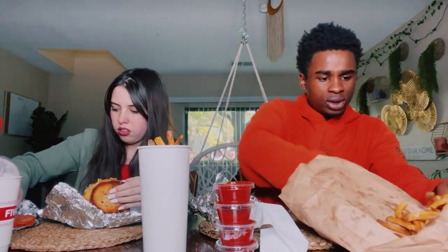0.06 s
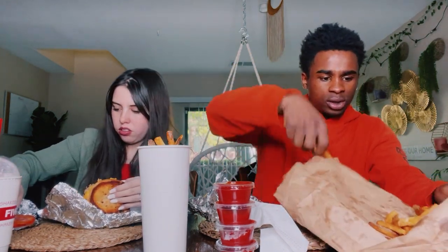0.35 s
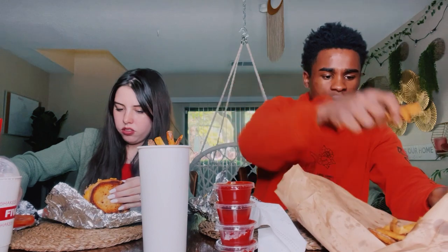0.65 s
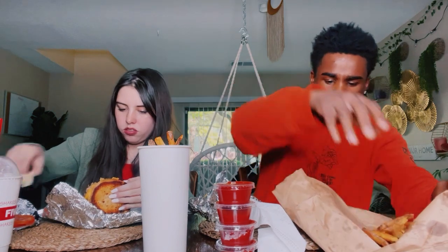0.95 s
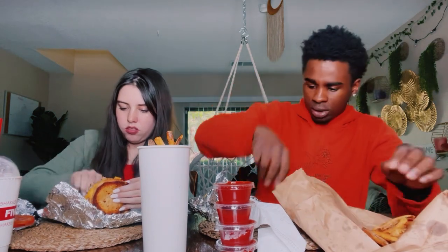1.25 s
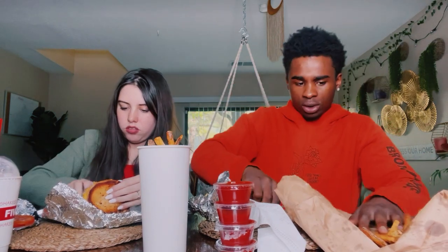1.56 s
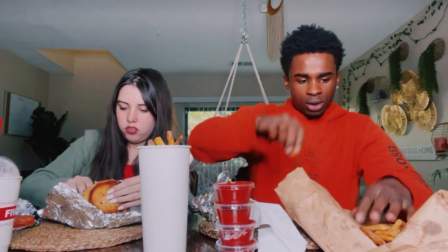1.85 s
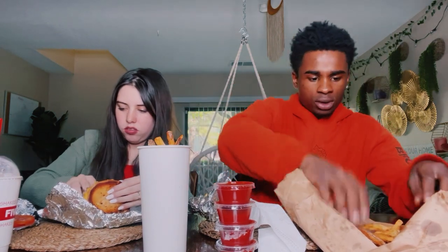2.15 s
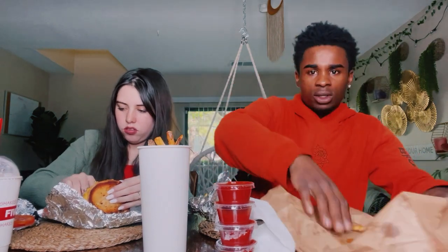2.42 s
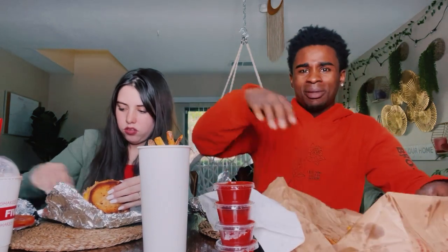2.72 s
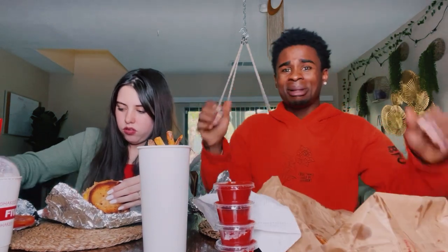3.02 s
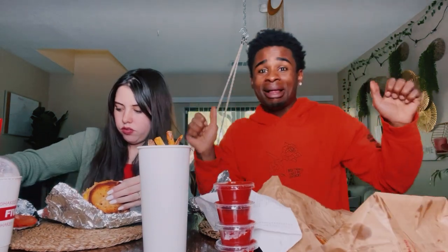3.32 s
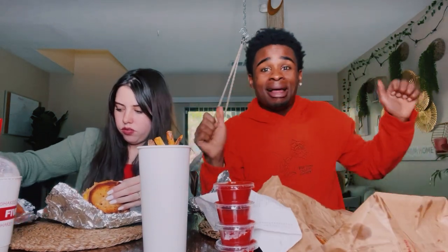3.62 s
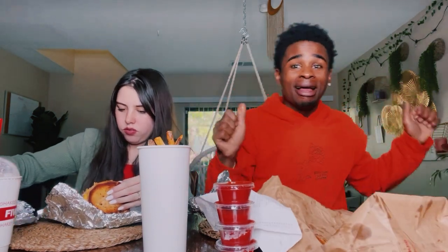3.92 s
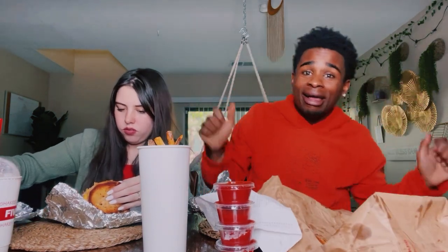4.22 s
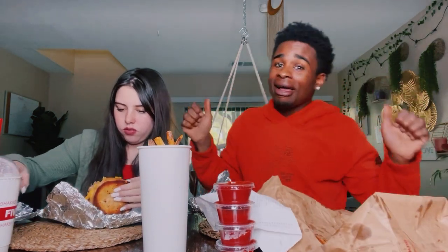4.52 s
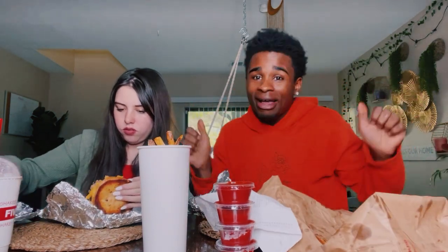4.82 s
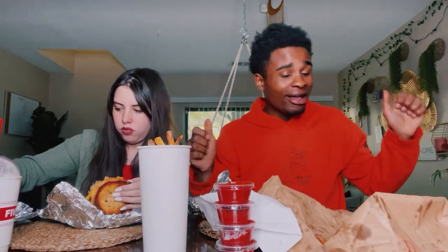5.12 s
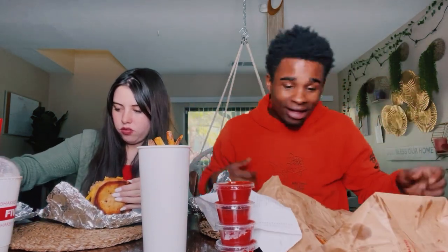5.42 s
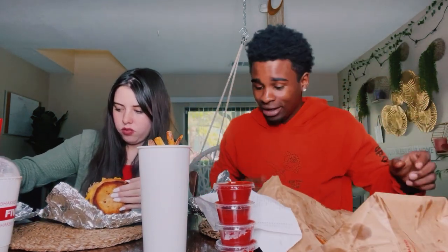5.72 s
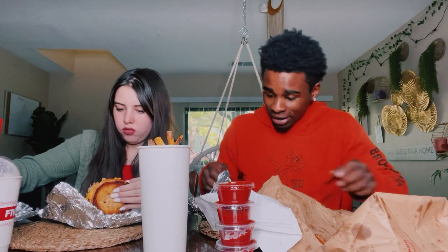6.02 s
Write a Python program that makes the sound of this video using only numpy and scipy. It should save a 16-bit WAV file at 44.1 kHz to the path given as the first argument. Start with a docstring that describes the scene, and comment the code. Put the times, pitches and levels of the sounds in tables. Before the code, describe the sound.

A paper takeout bag is handled on a dining table, close to the microphone and to the right, in a slightly echoing room with faint background hiss. From the start it crackles densely, with single sharp crease snaps and hollow pops, peaking at about 0.8 seconds while the table booms softly. After a short lull, another burst comes at 1.5 seconds. The longest loud crumpling runs from about 2.1 to 2.6 seconds as the bag is pressed flat, with two more sharp snaps just before 3 seconds. Then it is much quieter: light touches on paper, small clicks and low bumps as someone shifts in a seat. Clicks fall around 4.1 and 5.2 seconds, now more to the left. A few very faint, brief squeaks come between 4.6 and 5.7 seconds, and a light rustle with small clicks ends it around 6 seconds.

```python
"""A paper takeout bag is pushed, rummaged in and pressed flat on a dining table in a live room.
From the start, over faint room tone, its creases buckle in dense crackles and the table booms softly;
large creases snap singly and flat panels flip with hollow pops. After three seconds come only light
touches, small clicks and low bumps as someone shifts in a seat, and near the end a few faint
stick-slip squeaks. Two close microphone ports receive the direct sound and the room's echoes."""
import sys
import numpy as np
from scipy import signal
from scipy.fft import rfft, irfft, next_fast_len
from scipy.io import wavfile
from scipy.ndimage import uniform_filter1d

SR = 44100
rng = np.random.default_rng(int(sys.argv[2]) if len(sys.argv) > 2 else 0)


def wrap_up_sound(samples):
    """Save the sound to the file named by the first command line argument, as 16-bit audio."""
    columns = np.atleast_2d(samples).T
    # keep every value between -1 and 1, then stretch to whole-number steps
    tamed = np.clip(columns, -1, 1)
    steps = np.round(tamed * 32767).astype(np.int16)
    wavfile.write(sys.argv[1], SR, steps)


N = 267687
TIME = np.arange(N) / SR
BODY_HZ, RASP_HZ, CRISP_HZ = 600, 2300, 5500  # edges between the four registers

# Levels in the tables are relative.
# room air and microphone hiss: frequency_hz, density_db
AIR_SPECTRUM = [(20, -11.5), (130, 2), (290, -4), (470, -8.5), (680, -21.5), (1200, -22.5), (3600, -32),
                (5200, -32.5), (7000, -38), (10500, -32), (13200, -35), (14500, -48.5)]
# the background, a little lower while the paper is loud: time_s, gain_db
BACKGROUND_GAIN = [(0.0, -4), (1.3, -5.5), (3.2, -0.5)]
# strokes of a hand on paper: start_s, length_s, attack_s, level_db, easing_db, body_db, rasp_db, crisp_db
HAND_STROKES = [(0.0, 0.17, 0.00041, -41.5, 11.5, 0.5, -0.5, 0.5),
                (0.176, 0.14, 0.0048, -42, 7.5, 0.5, -1, 0), (0.335, 0.21, 0.03, -43.5, 4, 2, -0.5, -1),
                (0.554, 0.25, 0.011, -48.5, 0.5, 0.5, -4.5, -7),
                (0.763, 0.04, 0.0073, -29, 6.5, -2, 0.5, -1.5), (0.811, 0.21, .01, -46, 28, -0.5, 0, -15),
                (1.343, 0.26, 0.012, -52.5, -10, -4, -15.5, -4),
                (1.468, 0.066, 0.048, -31.5, 1.5, -2, -2, -2.5), (1.563, 0.25, 0.022, -51, 1.5, -1, 0, -3),
                (1.778, 0.041, 0.02, -44, -2.5, -5.5, 2, 0), (2.133, 0.098, 0.032, -31, 0, -4, -3, -1.5),
                (2.253, 0.17, 0.011, -35, 8, 1.5, 2.5, 1), (2.415, 0.2, 0.0073, -43, 14.5, -0.5, -3, 3),
                (2.721, 0.14, 0.018, -50, 7, 3.5, 8, 8.5), (3.343, 0.08, 0.027, -74, 1, -13.5, 7, -1),
                (3.48, 0.057, 0.037, -70.5, 1.5, 0, -1.5, 2.5), (3.673, 0.047, 0.022, -74, 2, -8, 5, -21),
                (3.799, 0.17, 0.079, -67, 0.5, 6, -3, -7.5),
                (4.039, 0.058, 0.045, -55.5, -5, -2, -25, -4.5),
                (4.456, 0.067, 0.037, -75, 0.5, -1.5, -4, 4.5),
                (5.248, 0.052, .004, -62.5, 4.5, 4.5, -3.5, 3.5),
                (5.641, 0.13, 0.066, -68.5, 2, 2, -3.5, 7.5), (5.88, 0.17, 0.025, -63, -3, 6.5, 3.5, 7)]
# radiation of a buckling crease: frequency_hz, density_db
PAPER_SPECTRUM = [(40, -27.5), (100, -4.5), (200, 0.5), (350, 0), (700, -3), (1250, -0.9), (2400, -3.5),
                  (4200, -10.5), (5700, -11.5), (7200, -17.5), (10000, -15.5), (13000, -20.5),
                  (15000, -34.5), (16500, -43)]
# boom of the furniture: frequency_hz, density_db
BOOM_SPECTRUM = [(20, -9.5), (40, -8.5), (56, 3.5), (70, 8), (88, -7), (135, -4), (190, -26.5), (400, -72)]
# low bumps of table and seat: start_s, level_db
FURNITURE_BUMPS = [(0.39, -55), (0.8, -50), (1.5, -56), (2.169, -44.5), (2.35, -54), (2.779, -59.5),
                   (3.036, -49.5), (3.479, -59), (3.899, -59.5), (4.16, -55.5), (4.28, -59), (5.725, -58.5),
                   (5.93, -58)]
# single crease snaps and light clicks: start_s, energy_db, body_db, crisp_db, ring_hz, flutter_decay_s
CREASE_SNAPS = [(0.0189, -18, -16, 6.5, 4200, 0.00063), (0.064, -16.5, -2.5, -14, 1470, 0.0044),
                (0.1156, -22, -5, -4.5, 1300, 0.0009), (0.1284, -11, 0.5, -0.5, 2500, .0012),
                (0.1744, -25.5, -1.5, 16.5, 4440, 0.00071), (0.198, -11.5, 5.5, -13.5, 1250, .0036),
                (0.378, -19, 0.5, -7.5, 925, 0.0031), (0.404, -19.5, -4.5, 2, 5120, 0.0013),
                (0.416, -12, -1, -7.5, 850, 0.0015), (0.442, -13, 0.5, -8.5, 790, 0.001),
                (0.5045, -15, -2, 0.5, 2300, 0.0035), (0.513, -15.5, -9, -7.5, 3000, 0.001),
                (0.529, -24, -4, 17.5, 5080, 0.00083), (0.5843, -9, -1.5, -1.5, 578, .0046),
                (0.594, -24.5, 0, -4, 1650, 0.0017), (0.6239, -11.5, -7.5, 2.5, 1907, 0.002),
                (0.658, -13, -4, 8.5, 705, 0.0013), (0.6759, -15, -1, 4, 1184, 0.0038),
                (0.731, -14, -1, 1.5, 445, .0012), (0.773, -14, -5, 7, 1274, 0.0018),
                (0.7913, -7, -3.5, 9.5, 1296, 0.0019), (1.2046, -35.5, 9.5, -30, 930, 0.0023),
                (1.3633, -28.5, -6.5, 1, 2200, .003), (1.4871, -11, -1.5, -1, 1300, 0.00055),
                (1.4995, -6, -1.5, -3, 1347, 0.0024), (1.521, -9, 0, -4, 1912, .005),
                (1.6061, -13, -9, 3.5, 3280, 0.00034), (1.648, -17, 6, 4, 721, 0.00071),
                (1.7871, -11, -11, 3.5, 2956, 0.0011), (1.808, -19.5, -4.5, -2.5, 2040, 0.0015),
                (1.9784, -17, -4, -1.5, 2883, 0.0037), (2.076, -35, 6, 6, 10500, 0.0053),
                (2.149, -11, 1, 6.5, 1220, 0.0045), (2.162, -7.5, -1.5, -4, 1050, 0.012),
                (2.2012, -11, -3.5, 8.5, 1500, .0008), (2.2118, -10, -6.5, 10.5, 3645, 0.0011),
                (2.232, -7.5, -5, 0, 2007, 0.0023), (2.2815, -7, -3, -7.5, 1100, 0.00099),
                (2.3061, -4.5, -8.5, -2, 2088, 0.00045), (2.3577, -7, 1.5, 3.5, 4000, 0.00041),
                (2.4198, -10, -1, -0.5, 450, 0.0014), (2.7418, -3.5, -3.5, 3.5, 2360, 0.0011),
                (2.8864, -7.5, -8, -2, 2330, 0.0012), (3.114, -20, 5, -17, 1650, 0.0056),
                (3.642, -36.5, 7.5, 4.5, 1040, 0.0089), (3.964, -39.5, 0.5, 9, 1506, 0.0054),
                (4.0362, -32, 0, -18, 1880, 0.0021), (4.102, -22.5, 4, -30, 1390, 0.017),
                (4.6574, -46, 1.5, 17.5, 3030, .007), (4.91, -46.5, -1.5, 0.5, 11000, .002),
                (5.151, -34.5, 7.5, -24.5, 820, 0.013), (5.256, -24.5, 3.5, 9.5, 1600, 0.0041),
                (5.3187, -33, 5, -16, 920, .0011), (5.896, -25, 3.5, 2, 920, 0.002),
                (5.928, -31, -3, -9, 1090, .0014), (6.009, -26.5, -12, 1, 1580, 0.0032)]
# flat panels flipping over or being knocked: start_s, pitch_hz, level_db
PANEL_POPS = [(0.128, 570, -38), (0.416, 485, -36.5), (0.442, 803, -30.5), (0.513, 566, -34.5),
              (0.527, 400, -41), (0.658, 710, -40.5), (0.774, 1243, -29.5), (0.79, 204, -32.5),
              (0.792, 1126, -32), (1.5, 820, -35), (1.527, 1020, -33), (1.526, 343, -40), (2.152, 950, -35),
              (2.158, 279, -33), (2.222, 1170, -30), (2.225, 520, -34), (2.28, 367, -28.5),
              (2.42, 359, -37), (2.419, 540, -32), (2.886, 662, -38.5), (5.151, 795, -59),
              (5.256, 445, -43.5), (5.9, 1640, -50), (5.929, 378, -48.5), (6.006, 1524, -40)]
# faint squeaks: start_s, length_s, start_hz, end_hz, level_db
SQUEAK_GLIDES = [(4.577, 0.055, 1328, 1340, -69.5), (4.927, 0.033, 2184, 2590, -68.5),
                 (4.928, 0.03, 2850, 3130, -76.5), (4.933, 0.038, 3700, 3820, -81),
                 (5.372, 0.045, 1365, 1558, -67), (5.375, 0.022, 2820, 2640, -74),
                 (5.386, 0.07, 2210, 1965, -68.5), (5.511, 0.027, 3680, 3740, -82.5),
                 (5.645, 0.025, 3630, 3770, -84)]
# where the sound is made: time_s, right_share (0 left, 1 right)
SOURCE_PLACE = [(3.2, 0.94), (3.6, 0.94), (4.1, 0.43), (4.6, 0.15), (5.2, 0.12), (5.9, 0.16), (6.02, 0.64)]
# lag of direct sound at the farther port: frequency_hz, phase_rad
FAR_PORT_LAG = [(0, 0), (200, .5), (650, 1.9), (1200, 1.9), (2500, 3.2), (4000, 6.3)]
# reverberation time of the room: frequency_hz, t60_s
ROOM_DECAY = [(100, 0.63), (400, 0.61), (1200, 0.43), (3000, 0.44), (7000, 0.33), (14000, 0.41)]
# drive to the room, weaker for touches nearer the microphone: time_s, gain_db
ROOM_DRIVE = [(2.6, 3), (5.0, 1), (5.9, 3.5)]
# surviving part of the difference between the ports: frequency_hz, gain_db
PORT_WIDTH = [(60, -8), (140, -9), (280, -4), (500, 1.5), (2500, 2), (7000, -1), (9500, -1), (11500, -6),
              (14000, -6)]
# treble phase between the ports: frequency_hz, phase_rad
PORT_PHASE_SHIFT = [(4000, 0), (5300, -2.8), (7200, -3), (9200, -1.5), (11300, -.1)]


def amp(db):
    """Converts decibels to an amplitude ratio."""
    return 10 ** (np.asarray(db) / 20)


def unit_rms(x):
    """Normalises a signal to unit mean power."""
    return x / np.sqrt(np.mean(x ** 2) + 1e-20)


def curve(points, hz):
    """Interpolates a table on a logarithmic frequency axis."""
    table_hz, value = np.transpose(points)
    return np.interp(np.log(hz + 1), np.log(table_hz + 1), value)


def add(mix, start_s, sound):
    """Superposition: a sound sums into the mix from start_s on."""
    part = mix[max(round(start_s * SR), 0):][:len(sound)]
    part += sound[:len(part)]


def filtered(x, response):
    """Linear filtering: the spectrum is multiplied by a frequency response."""
    size = next_fast_len(x.shape[-1] + 4096)
    return irfft(rfft(x, size) * response(np.fft.rfftfreq(size, 1 / SR)), size)[..., :x.shape[-1]]


def noise(spectrum, shape):
    """Spectral shaping: white noise takes on a tabulated spectrum."""
    return filtered(rng.standard_normal(shape), lambda hz: amp(curve(spectrum, hz)))


def steadied(x, span_s):
    """Division by the running rms flattens the envelope and keeps the fine structure."""
    size = max(int(span_s * SR), 2)
    power = uniform_filter1d(uniform_filter1d(x ** 2, size), size)
    return x / np.sqrt(abs(power) + 1e-4 * np.mean(x ** 2))


def registers(hz):
    """Complementary bands: the shares of body, middle, rasp and crisp treble sum to 1."""
    below = [1 / (1 + (hz / edge) ** order) for edge, order in ((BODY_HZ, 4), (RASP_HZ, 4), (CRISP_HZ, 5))]
    return np.diff(below, axis=0, prepend=0, append=1)


def room_tone(level_db=-69):
    """Stationary noise of air and microphone, uncorrelated between the ports."""
    return amp(level_db) * unit_rms(noise(AIR_SPECTRUM, (2, N)))


def hand_effort(release_s=0.013):
    """Incoherent strokes add in power; each rises, drifts and lets go. Gives one gain per register."""
    power = np.zeros((4, N))
    for start_s, length_s, attack_s, db, easing_db, body_db, rasp_db, crisp_db in HAND_STROKES:
        age = TIME - start_s
        attack = np.clip(age / attack_s, 0, 1)
        hold = amp(db - easing_db * np.clip(age / length_s, 0, 1))
        release = np.exp(-np.maximum(age - length_s, 0) / release_s)
        power += (amp([[body_db], [0], [rasp_db], [crisp_db]]) * attack * hold * release) ** 2
    return np.sqrt(power + 1e-14)


def crease(ring_hz, ring_db, flutter_s, flutter, body_db, crisp_db,
           spread_s=0.001786, ring_octaves=0.33, dulling=.25, size=2048):
    """Buckling: an impulse and a brief flutter excite a panel resonance, one row per row of ring_db."""
    t, hz = np.arange(size) / SR, np.fft.rfftfreq(size, 1 / SR)
    shake = rng.standard_normal(size) * np.exp(-t / flutter_s)
    shake *= flutter / np.linalg.norm(shake)
    shake[0] += rng.choice([-1, 1])
    force = rfft(shake)
    force /= np.sqrt(uniform_filter1d(abs(force) ** 2, size=15))  # broadband: the panel gives the colour
    resonance_db = ring_db * np.exp(-(np.log2((hz + 1) / ring_hz) / ring_octaves) ** 2)
    panel = amp(curve(PAPER_SPECTRUM, hz) + resonance_db)
    panel /= np.sqrt(np.mean(panel ** 2, axis=-1, keepdims=True))
    rasp_db = dulling * min(crisp_db, 0)  # a muffled crease loses some rasp too
    colour = panel * (amp([body_db, 0, rasp_db, crisp_db]) @ registers(hz))
    log_gain = np.log(np.concatenate([colour, colour[..., -2:0:-1]], axis=-1))
    minimum_phase = np.exp(np.conj(signal.hilbert(log_gain)))[..., :len(hz)]
    delay_s = spread_s * np.sqrt(BODY_HZ / (hz + BODY_HZ / 2))  # bending waves arrive treble first
    return irfft(force * minimum_phase * np.exp(-2j * np.pi * np.cumsum(delay_s) * hz[1]))


def rustle(gains, per_s=280, crowding=.7, size_db=6.0, rub=0.11, light_db=13,
           ring_db=9.5, level_db=-1.85, jerk_db=0.5, panels=56):
    """Small creases buckle as a Poisson process whose rate grows with effort, over sliding friction."""
    work_db = 20 * np.log10(gains[1])
    rate = per_s * amp(crowding * np.maximum(work_db + 41.5, -5))
    sizes = amp(size_db * np.minimum(rng.exponential(1, N), 2.9))
    kicks = sizes * (rng.random(N) < rate / SR)
    panel = rng.integers(0, panels, N)  # each crease rings a panel of its own size
    crackle = np.zeros(N)
    for k, ring_hz in enumerate(np.geomspace(330, 11000, panels)):
        body_db, crisp_db = rng.normal(0, 4.4, 2)
        grain = crease(ring_hz, ring_db, flutter_s=0.001, flutter=1.5, body_db=body_db, crisp_db=crisp_db)
        crackle += signal.oaconvolve(kicks * (panel == k), grain[:1024])[:N]
    sliding = unit_rms(noise(PAPER_SPECTRUM, N))
    brushing = amp(light_db * np.clip(-(work_db + 43.5) / 20, 0, 1))  # a lighter touch slides more
    paper = unit_rms(unit_rms(crackle) + rub * brushing * sliding)
    bands = np.array([band.std() * steadied(band, span_s=0.046) for band in filtered(paper, registers)])
    knots = N // 700  # paper catches and lets go in jerks of about 16 ms
    jerks = np.interp(TIME, np.linspace(0, TIME[-1], knots), rng.standard_normal(knots))
    return amp(level_db + jerk_db * jerks) * (gains * bands).sum(0)


def furniture_boom(work, background_db, push_db=-28, fidget_db=-67.5, swing_db=4, fidgets_per_s=4.9,
                   rise_s=0.051, decay_s=0.042, side_db=-6):
    """Forced vibration: strokes on the bag, shifts of weight and single bumps drive table and seat."""
    swing = np.interp(TIME * fidgets_per_s, np.arange(N), rng.standard_normal(N))
    power = amp(fidget_db + swing_db * swing + background_db) ** 2 + (amp(push_db) * work) ** 2
    for start_s, db in FURNITURE_BUMPS:
        age = np.maximum(TIME - start_s, 0)
        power += (amp(db) * np.minimum(age / rise_s, np.exp((rise_s - age) / decay_s))) ** 2
    mid, side = noise(BOOM_SPECTRUM, (2, N))
    antiphase = amp(side_db) * unit_rms(side) * np.array([[1], [-1]])
    return np.sqrt(power) * (steadied(mid, span_s=0.031) + antiphase)


def snaps(level_db=-3.5, facing_ring_db=9.0, around_ring_db=3.0, flutter=2.0):
    """Directivity: a large crease gives way and its panel beams the ring forward. Gives (facing, around)."""
    facing, around = np.zeros((2, N))
    ring_db = np.array([[facing_ring_db], [around_ring_db]])
    for start_s, db, body_db, crisp_db, ring_hz, flutter_s in CREASE_SNAPS:
        ahead, aside = amp(db + level_db) * crease(ring_hz, ring_db, flutter_s, flutter, body_db, crisp_db)
        add(facing, start_s, ahead)
        add(around, start_s, aside)
    return facing, around


def pops(rise_s=0.00071, body_decay_s=0.0057, stretch=0.068, roughness=0.54, size=4096):
    """Snap-through: a panel flips and rings as a damped oscillator, roughened by its creases."""
    out, t = np.zeros(N), np.arange(size) / SR
    for start_s, pitch_hz, db in PANEL_POPS:
        decay_s = body_decay_s * (BODY_HZ / pitch_hz) ** .25  # smaller, higher panels die sooner
        hz = pitch_hz * (1 + stretch * np.exp(-2 * t / decay_s))  # starts taut and sharp, then relaxes
        grit = unit_rms(uniform_filter1d(rng.standard_normal(size), size=30))
        ring = np.sin(2 * np.pi * np.cumsum(hz) / SR) * (1 + roughness * grit)
        envelope = (1 - np.exp(-t / rise_s)) * np.exp(-t / decay_s)
        add(out, start_s, amp(db) * ring * envelope)
    return out


def squeaks(level_db=-3.0, waver=0.055):
    """Stick-slip friction: short gliding whistles, irregular in pitch and amplitude."""
    out = np.zeros(N)
    for start_s, length_s, start_hz, end_hz, db in SQUEAK_GLIDES:
        n = int(length_s * SR)
        slip, grip = unit_rms(uniform_filter1d(rng.standard_normal((2, n)), size=70))
        hz = np.linspace(start_hz, end_hz, n) * (1 + waver * slip)
        whistle = np.sin(2 * np.pi * np.cumsum(hz) / SR) * (1 + .5 * grip)
        add(out, start_s, amp(db + level_db) * unit_rms(whistle * signal.windows.tukey(n, .5)))
    return out


def direct_sound(x, level_db=-6.5, treble_db=2.5, shade_db=7.0):
    """Path difference and shading: the nearer port hears sooner and louder. Gives (far, near)."""
    def port(hz, side):
        shade = shade_db * curve([(100, 0.41), (500, 0.7), (4000, 0.69), (9000, 0.98)], hz)
        gain = amp(level_db + treble_db * registers(hz)[-1] + side * shade)
        return gain * np.exp(1j * min(side, 0) * curve(FAR_PORT_LAG, hz))
    return np.array([filtered(x, lambda hz: port(hz, side)) for side in (-1, 1)])


def room_response(early_s=0.01, early_db=4, late_s=.035):
    """Impulse response at each port: early reflections from table and walls, then an exponential tail."""
    def level(spectrum, bins):
        return np.sqrt(abs(uniform_filter1d(abs(spectrum) ** 2, size=bins)))
    t = np.arange(SR) / SR
    taps = rng.standard_normal((2, SR)) * (t > .002) * (1 + amp(early_db) * np.exp(-t / early_s))
    hz, age, frames = signal.stft(taps, SR, nperseg=256)
    decay = 1e-3 ** (age / curve(ROOM_DECAY, hz)[:, None])
    tail = signal.istft(frames * decay, SR, nperseg=256)[1][:, :SR]
    # a diffuse field favours no pitch, so the early and late spectra are both evened out
    late = np.clip(t / late_s, 0, 1) ** 2
    parts = rfft(np.array([tail * (1 - late), tail * late]), 2 * SR)
    response = (parts * level(parts, bins=4000) / level(parts, bins=200)).sum(0)
    return irfft(response / level(response, bins=4000))[:, :SR]


def reverberation(x, wet_db=-0.66, treble_db=-3.0, patterns=6, patterns_per_s=17):
    """Room reverberation: echo patterns crossfade at a steady rate, keeping the tail smooth and diffuse."""
    cycle = patterns_per_s * TIME
    wet = 0
    for k in range(patterns):
        offset = abs((cycle - k + patterns / 2) % patterns - patterns / 2)
        share = np.cos(np.pi / 2 * np.minimum(offset, 1))
        wet = wet + signal.fftconvolve((x * share)[None], room_response(), axes=1)[:, :N]
    return filtered(wet, lambda hz: amp(wet_db + treble_db * registers(hz)[-1]))


def scene():
    """Direct and diffuse fields sum: the bag lies to the right, the late clicks more to the left."""
    background_db = np.interp(TIME, *np.transpose(BACKGROUND_GAIN))
    air = amp(background_db) * room_tone()
    gains = hand_effort()
    paper = rustle(gains)
    boom = furniture_boom(gains[1], background_db)
    snaps_facing, snaps_around = snaps()
    hollow, whistles = pops(), squeaks()
    # snaps, pops and squeaks come from spots that face the microphone, so they sound drier
    near = paper + amp(4) * snaps_facing + amp(5) * hollow + amp(3) * whistles
    into_room = paper + amp(-0.8) * snaps_around + amp(-3) * (hollow + whistles)
    right = np.interp(TIME, *np.transpose(SOURCE_PLACE))
    placed = direct_sound(near * np.sqrt(right)) + direct_sound(near * np.sqrt(1 - right))[::-1]
    drive = amp(np.interp(TIME, *np.transpose(ROOM_DRIVE)))
    return placed + reverberation(drive * into_room) + boom + air


def record(dry, edge_hz=15900):
    """Mid-side filtering: the port pair narrows bass and top treble, shifts phase and limits the band."""
    mid = dry.mean(0)
    side = filtered((dry[0] - dry[1]) / 2, lambda hz: amp(curve(PORT_WIDTH, hz)))
    left = filtered(mid + side, lambda hz: np.exp(.5j * curve(PORT_PHASE_SHIFT, hz)))
    right = filtered(mid - side, lambda hz: np.exp(-.5j * curve(PORT_PHASE_SHIFT, hz)))
    low_pass = signal.firwin(401, edge_hz, window=("kaiser", 9), fs=SR)
    return signal.oaconvolve(np.array([left, right]), low_pass[None], "same", axes=1)


dry = scene()
out = record(dry)
wrap_up_sound(out)
```